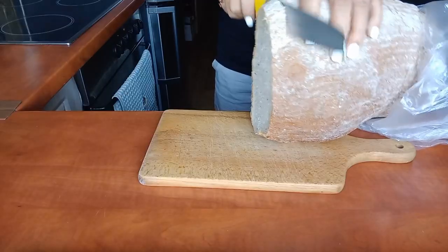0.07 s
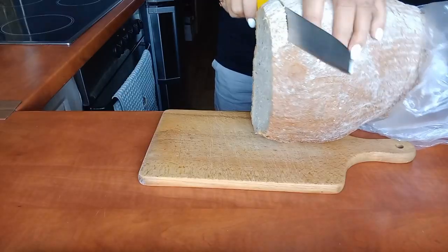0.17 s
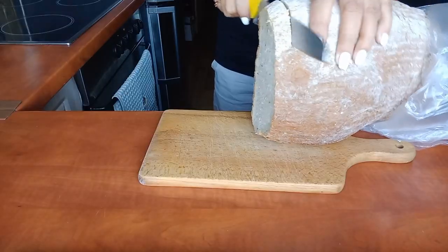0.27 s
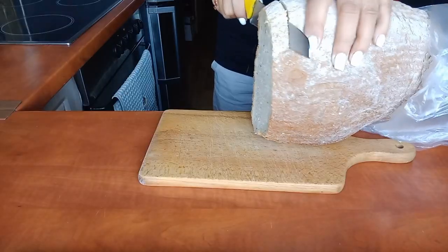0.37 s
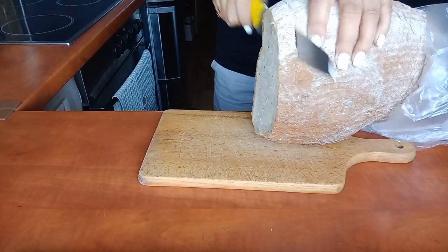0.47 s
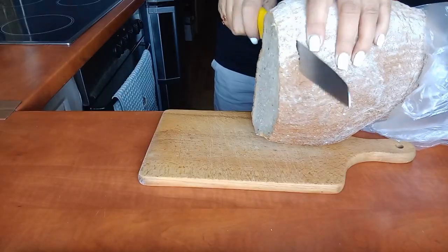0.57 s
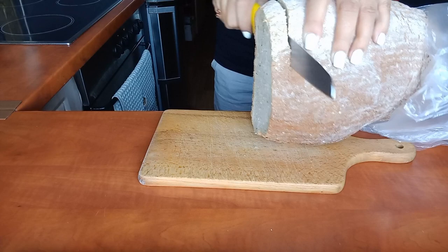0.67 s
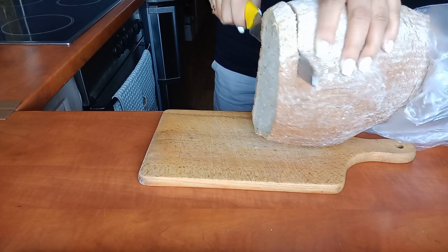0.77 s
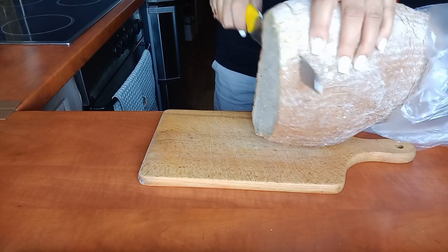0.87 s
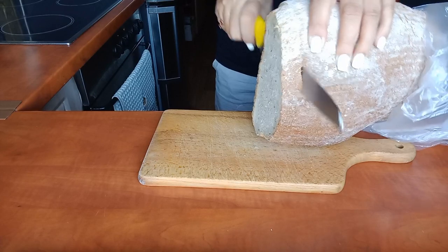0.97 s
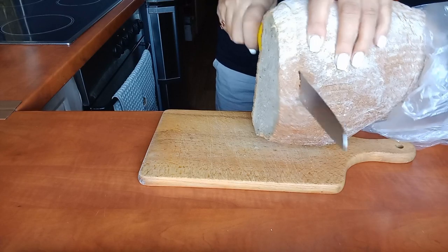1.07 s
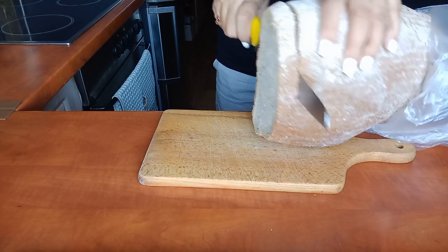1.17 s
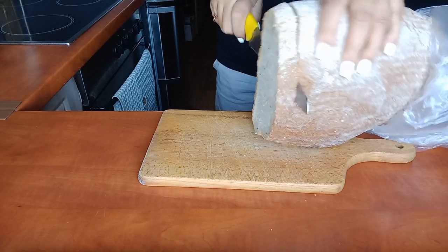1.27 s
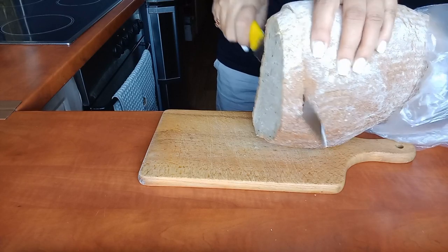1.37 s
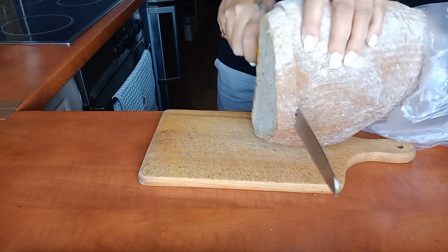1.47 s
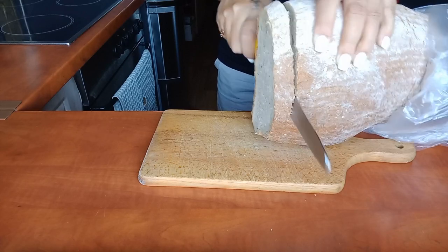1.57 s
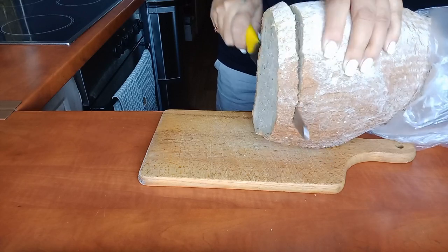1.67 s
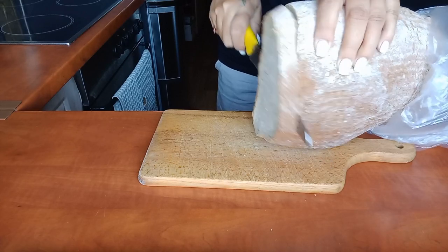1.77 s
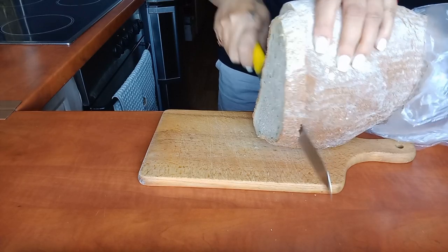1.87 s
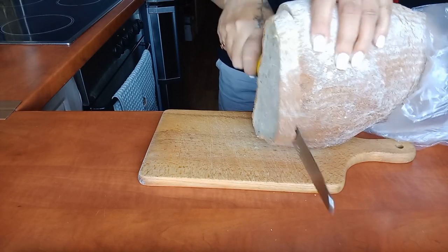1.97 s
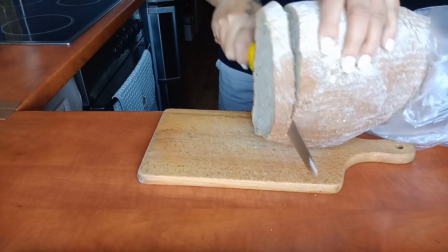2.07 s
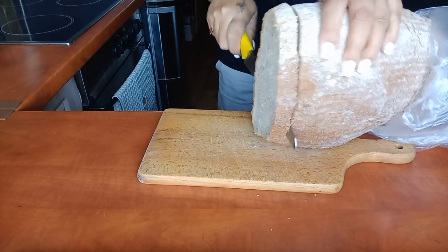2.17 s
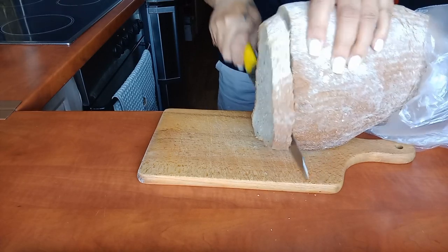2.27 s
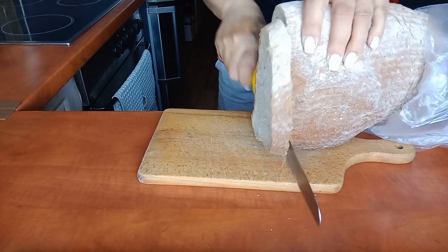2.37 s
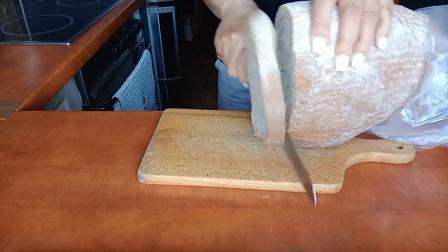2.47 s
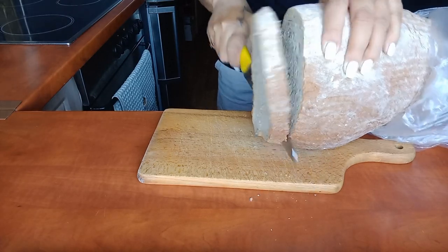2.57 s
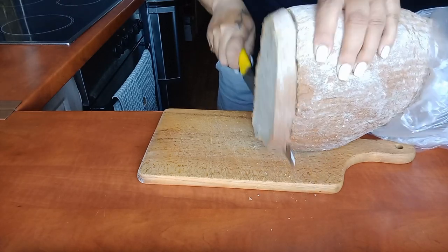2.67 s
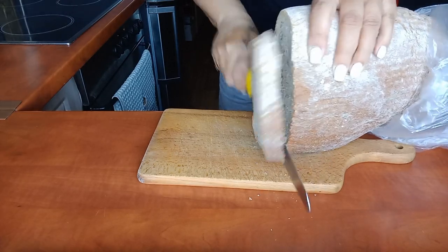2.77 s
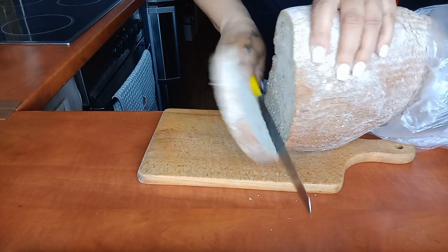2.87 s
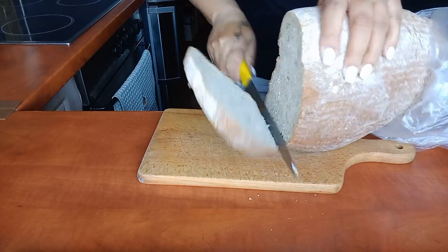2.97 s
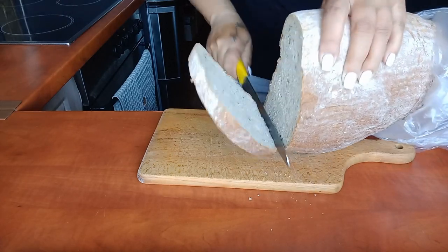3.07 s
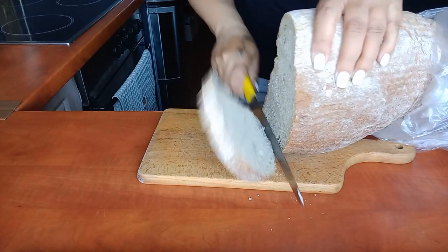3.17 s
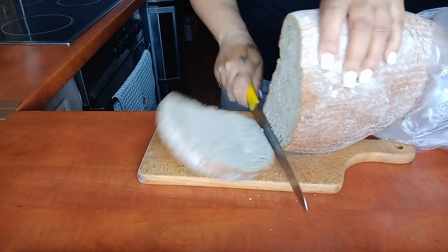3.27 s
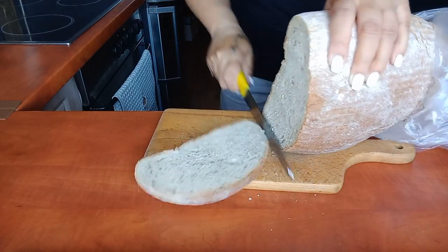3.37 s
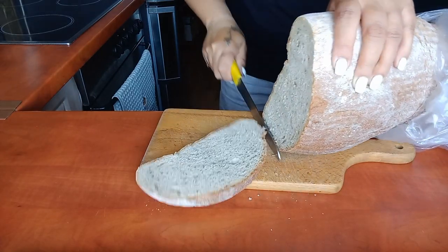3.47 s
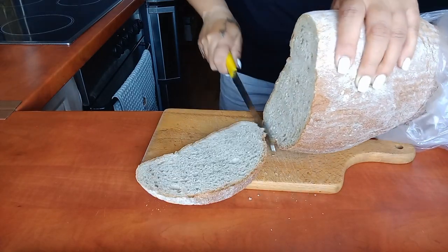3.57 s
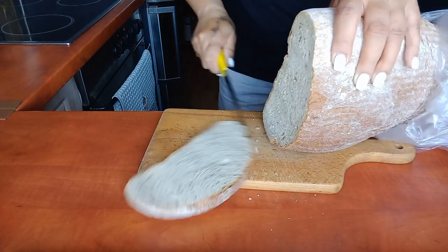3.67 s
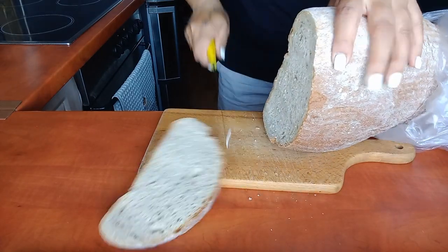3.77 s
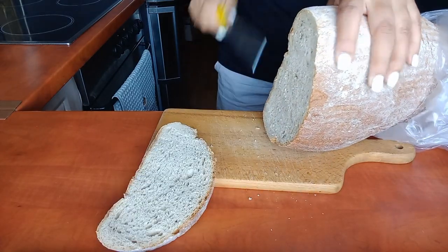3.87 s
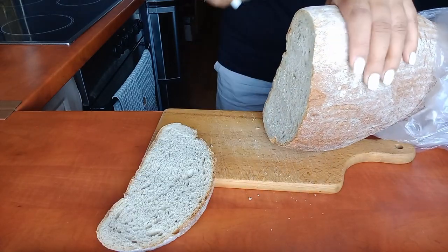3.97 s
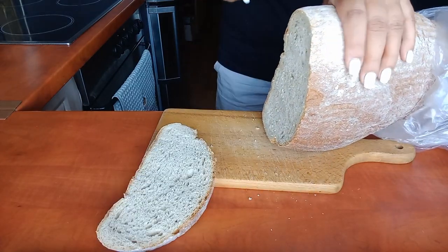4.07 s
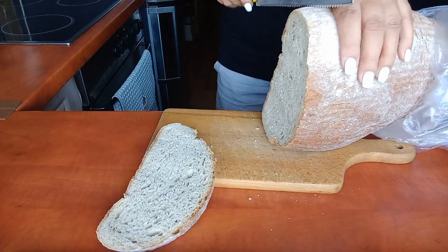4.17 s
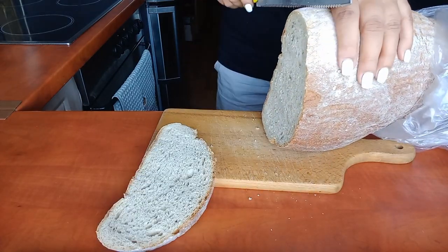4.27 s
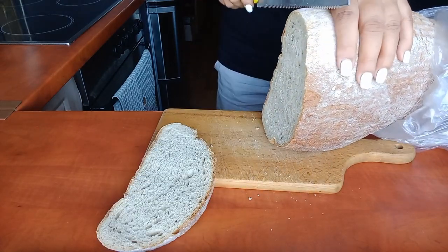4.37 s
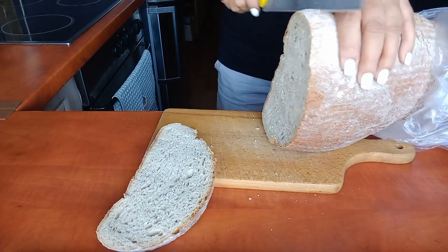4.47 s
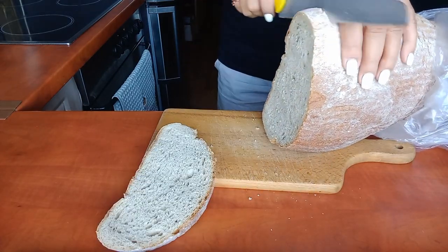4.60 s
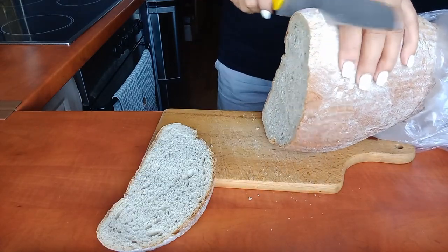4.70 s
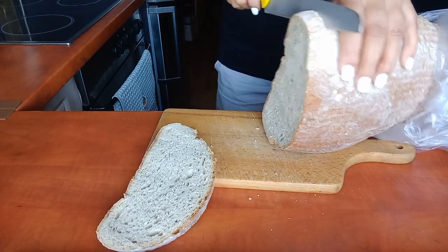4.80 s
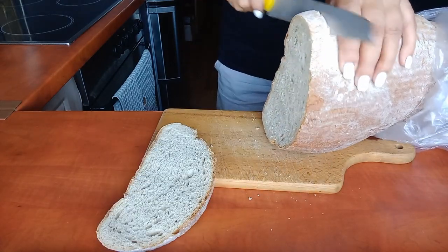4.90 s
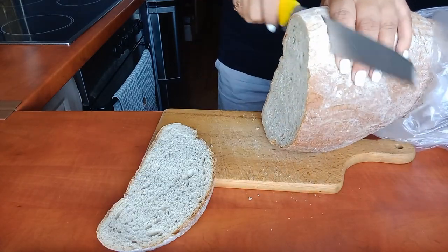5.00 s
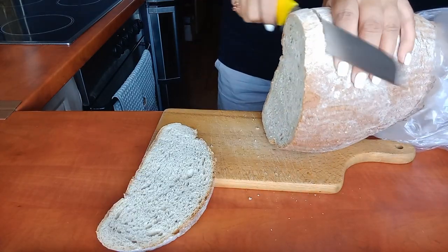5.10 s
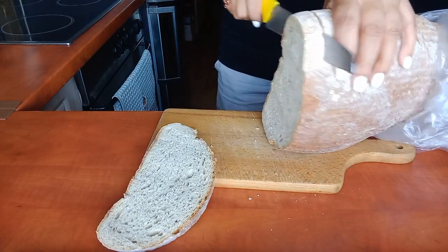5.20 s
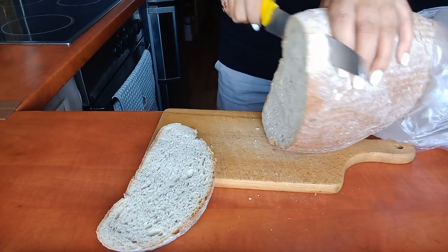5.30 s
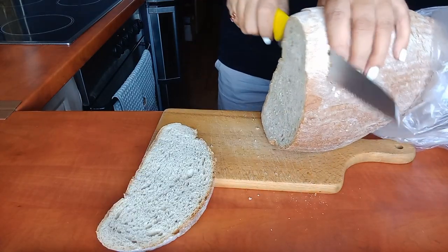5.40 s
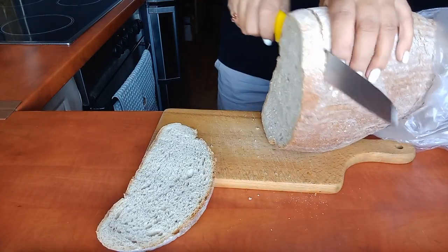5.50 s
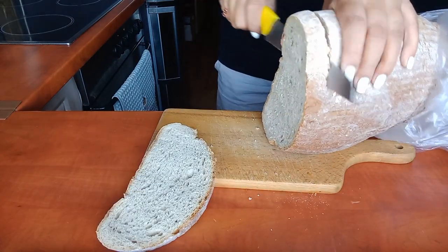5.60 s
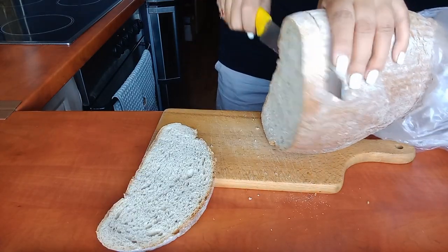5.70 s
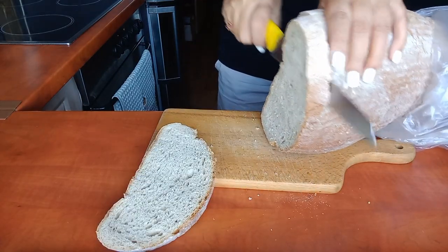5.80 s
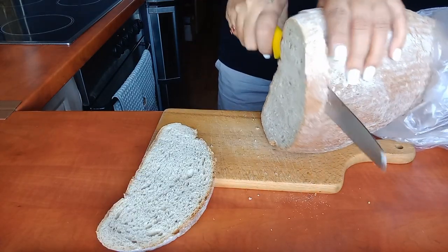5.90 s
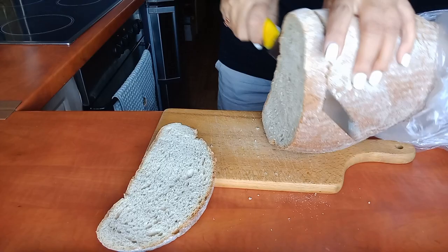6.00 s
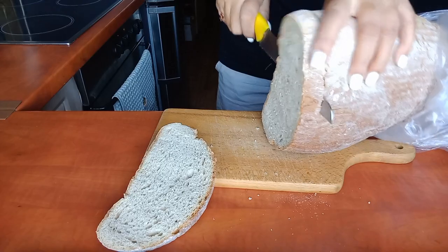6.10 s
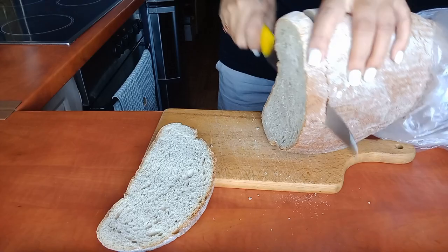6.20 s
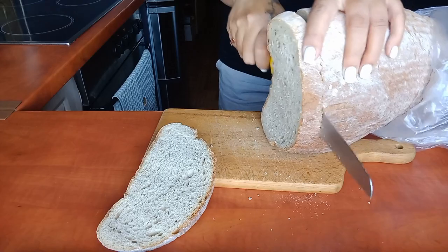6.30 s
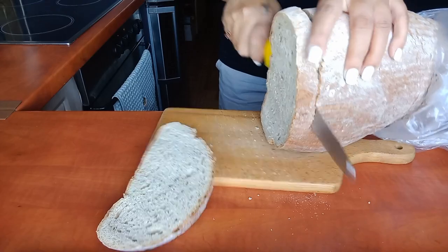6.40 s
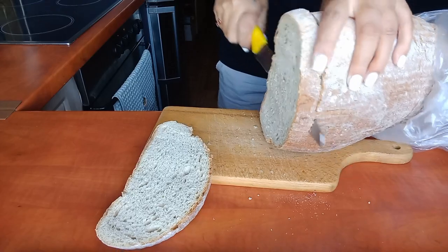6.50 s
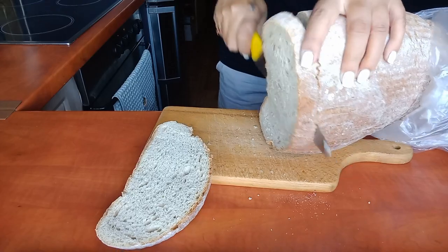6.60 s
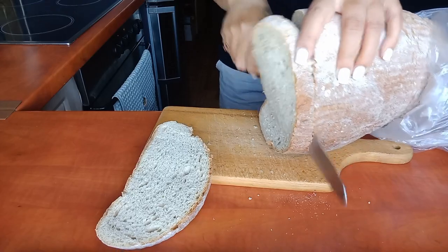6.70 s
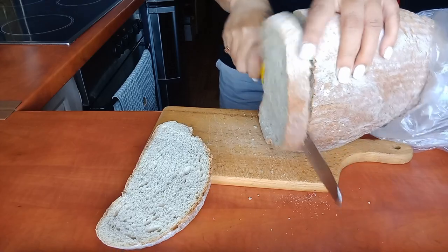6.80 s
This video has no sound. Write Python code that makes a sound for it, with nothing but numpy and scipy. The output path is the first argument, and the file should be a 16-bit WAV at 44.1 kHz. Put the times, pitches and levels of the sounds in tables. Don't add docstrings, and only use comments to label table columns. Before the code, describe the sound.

A serrated knife saws through a crusty loaf in steady rasping strokes, the slice slaps onto a wooden board, and sawing starts again.

```python
import sys
import numpy as np
from scipy import signal
from scipy.fft import rfft, irfft
from scipy.io import wavfile

SR = 44100
rng = np.random.default_rng(int(sys.argv[2]) if len(sys.argv) > 2 else 0)


def gain_from_db(level_db):
    decades = np.asarray(level_db, float) / 20
    return 10 ** decades


def materialize(psi):
    bounded = np.clip(np.atleast_2d(psi).T, -1, 1)
    quanta = np.round(bounded * 32767).astype(np.int16)
    wavfile.write(sys.argv[1], SR, quanta)


N = 302085

# start in seconds, length in seconds, crust hiss in dB, crumb tearing in dB, dryness in dB.
FIRST_SLICE_STROKES = [(0.014, 0.14, -40.5, -47, 7), (0.239, 0.13, -40, -41, 9),
                       (0.46, 0.13, -43, -50.5, 6.5), (0.708, 0.13, -41, -40, 4),
                       (0.903, 0.18, -43.5, -41.5, -4), (1.171, 0.14, -40, -35.5, -21),
                       (1.379, 0.15, -39, -33, -10), (1.613, 0.13, -39.5, -35.5, -1.5),
                       (1.82, 0.16, -41.5, -36.5, -3.5), (2.066, 0.17, -44, -40, 2),
                       (2.291, 0.14, -42, -38, 5), (2.522, 0.15, -43, -44, 7.5),
                       (2.725, 0.15, -42, -40.5, 7), (2.946, 0.17, -46, -50, 9.5),
                       (3.141, 0.19, -42, -35, 1), (3.343, 0.18, -41.5, -41.5, 6.5)]
SECOND_SLICE_STROKES = [(4.495, 0.17, -49.5, -48.5, -7), (4.701, 0.18, -48.5, -59, 12.5),
                        (4.931, 0.15, -38.5, -37, 0), (5.138, 0.12, -39, -40, 5.5),
                        (5.337, 0.14, -41, -39, -7), (5.569, 0.13, -43, -35.5, -6),
                        (5.785, 0.13, -39.5, -38.5, 1.5), (5.998, 0.13, -41, -34.5, -11),
                        (6.195, 0.16, -40, -33, -12), (6.434, 0.14, -41, -31.5, -13),
                        (6.656, 0.13, -39.5, -37, 7.5)]
# hardest push in seconds after the stroke's start,
# push length in seconds, deep shake in dB, upper shake in dB, tooth catches per second.
FIRST_SLICE_PUSHES = [(0.069, 0.13, -36.5, -36, 112), (.075, .14, -48, -39.5, 128),
                      (.062, 0.1, -32.5, -32, 104), (.055, 0.14, -35.5, -36.5, 94),
                      (.082, 0.15, -38, -38.5, 95), (.072, 0.12, -28, -34.5, 100),
                      (0.0579, .16, -34.5, -37.5, 99), (.048, 0.12, -30, -34, 128),
                      (.085, .14, -37, -36, 110), (0.0869, .12, -35, -36, 112),
                      (.06, 0.15, -41.5, -40, 128), (.06, 0.12, -43, -41.5, 120),
                      (.075, 0.12, -41.5, -42.5, 108), (.06, 0.093, -42.5, -41.5, 127),
                      (0.088, .15, -36, -33, 125), (0.07, .14, -37.5, -41, 131)]
SECOND_SLICE_PUSHES = [(0.053, 0.14, -40.5, -44.5, 91), (.09, .12, -41, -47.5, 125),
                       (.095, 0.12, -34, -39, 105), (0.076, 0.12, -65, -38, 122),
                       (.08, 0.13, -30.5, -36.5, 106), (.085, 0.18, -38.5, -38, 98),
                       (0.036, 0.1, -31.5, -36.5, 90), (.08, .14, -34, -38, 120),
                       (.085, .15, -36.5, -35.5, 93), (.07, .14, -34.5, -39.5, 127),
                       (0.059, 0.12, -35, -35.5, 125)]
BITES = [0.464, 0.704, 1.179, 2.073, 2.31, 2.533, 3.15, 3.404, 4.93, 5.575, 6.43]
# time in seconds, peak in dB.
CRUST_SNAPS = [(0.4647, -32), (0.5008, -36), (0.7078, -36), (1.01, -28), (1.399, -30), (1.474, -26.5),
               (1.674, -42), (1.8849, -18), (1.9571, -34), (2.316, -30.5), (2.996, -43), (3.057, -35),
               (3.3585, -30.5), (3.4094, -28), (3.4271, -33), (3.6943, -48), (4.2061, -55.5), (4.967, -38),
               (5.176, -27), (5.818, -28), (5.8343, -24), (6.2187, -26), (6.444, -32), (6.5096, -28),
               (6.6394, -39), (6.6765, -28), (6.743, -23), (6.7443, -34)]
# time in seconds, pressure on the board in dB.
SLICE_PRESSURE = [
    (3.404, -42),
    (3.426, -40.5),
    (3.455, -35),
    (3.51, -41.5),
    (3.65, -50.5),
    (3.71, -52.5),
    (3.8, -61),
    (3.83, -65),
    (3.93, -74.5),
]
# time in seconds, peak in dB.
SLICE_KNOCKS = [(3.405, -33), (3.4257, 4), (3.4346, -20), (3.4435, -30), (3.4553, -12), (3.4647, -13),
                (3.4712, -13), (3.4791, -15), (3.4848, -15), (3.494, -11), (3.5024, -22), (3.5172, -16.5),
                (3.5327, -15.5), (3.5435, -21), (3.6136, -34), (3.6202, -28.5), (3.6543, -26),
                (3.6604, -21), (3.6718, -33), (3.679, -20), (3.689, -29.5), (3.6964, -18), (3.7059, -20.5),
                (3.7162, -30), (3.7896, -40)]
# time in seconds, level in dB.
BAG_CREASES = [
    (3.955, -62.5),
    (4.038, -65.5),
    (4.082, -64),
    (4.166, -68.5),
    (4.26, -73),
]

# frequency in Hz, level in dB, 60 dB decay in seconds.
COUNTER_DEEP_MODES = [(94.8, -1.5, 0.057), (129.4, -5, 0.084)]
COUNTER_UPPER_MODES = [(198, -8.5, 0.071), (199.8, 8.5, 0.073), (212, -1, 0.047), (284.6, 0.5, 0.13)]
BOARD_MODES = [(250, -5.5, 0.084), (350, -8, 0.073), (493, -7, .08), (559, -6.5, 0.019),
               (670, -24.5, 0.062), (794, -1, 0.06), (908, 5, 0.036), (1007, -2.5, 0.048),
               (1084, -5.5, 0.023), (1280, 5, 0.016), (1530, -13.5, 0.017), (1560, 1, 0.017)]

# frequency in Hz, level in dB per Hz.
CRUMB_COLOUR = [(180, -32), (300, -6.5), (384, -3.5), (483, -2), (718, -6.5), (822, -9.5), (883, -7),
                (1120, -12), (1260, -11), (2000, -16.5), (2600, -58.5), (4400, -120)]
CRUST_COLOUR = [(710, -22.5), (1200, -12), (1290, -4), (1830, -4.5), (2020, -2.5), (2980, -5.5), (3790, -6),
                (6950, -11.5), (7910, -5.5), (9210, -18.5), (13200, -15), (15200, -15.5), (16000, -33)]
BAG_COLOUR = [(1180, -30), (2000, -11), (3140, -10), (4450, -6.5), (6590, -7.5), (7910, 1), (9330, -12.5),
              (11700, -11.5), (15100, -8), (16000, -10.5)]
AIR_COLOUR = [(24, -48.5), (40, -28.5), (66, -15.5), (124, -10), (171, -20.5), (226, -16), (422, -23.5),
              (831, -21), (1040, -26.5), (2210, -34.5), (7730, -30), (9450, -38.5), (16000, -46)]
# frequency in Hz, level in dB rms.
FRIDGE_HUM = [(86.1, -71.5), (172.3, -67.5), (199.2, -77)]


def rms_one(x):
    return x / np.sqrt(np.mean(x ** 2) + 1e-20)


def bandpass(x, order, low_hz, high_hz):
    return signal.sosfilt(signal.butter(order, [low_hz, high_hz], "band", fs=SR, output="sos"), x)


def in_time(rows, outside):
    s, *columns = np.transpose(rows)
    return np.array([np.interp(np.arange(N) / SR, s, c, outside, outside) for c in columns])


def drift(rate_hz):
    r = np.exp(-40 * np.pi * rate_hz / SR)
    noise = rng.standard_normal(N // 20 + 2002)
    slow = signal.lfilter([1], [1, -2 * r, r * r], noise)[2000:]
    return np.interp(np.arange(N) / 20, np.arange(len(slow)), rms_one(slow))


def colour(x, spectrum):
    hz, level_db = np.transpose(spectrum)
    grid_hz = np.maximum(np.arange(2049) * SR / 4096, 1)
    log_gain = np.interp(np.log(grid_hz), np.log(hz), level_db) * np.log(10) / 20
    cepstrum = irfft(log_gain)
    cepstrum[1:2048] *= 2
    cepstrum[2049:] = 0
    impulse = irfft(np.exp(rfft(cepstrum)))
    return rms_one(signal.fftconvolve(x, impulse)[:N])


def ring(clicks, modes):
    out = 0
    for hz, level_db, t60_s in modes:
        r, w = gain_from_db(-60 / (t60_s * SR)), 2 * np.pi * hz / SR
        poles = [1, -2 * r * np.cos(w), r * r]
        out = out + signal.lfilter([0, gain_from_db(level_db) * np.sin(w)], poles, clicks + 1e-18)
    return out


def swells(top_s, rise_s, fall_s, top_db, shape):
    rise_db, rise_power, fall_db, fall_power = shape
    after_s = np.arange(0, N + 40, 40) / SR - top_s[:, None]
    rise = rise_db * (np.maximum(-after_s, 0) / rise_s[:, None]) ** rise_power
    fall = fall_db * (np.maximum(after_s, 0) / fall_s[:, None]) ** fall_power
    power = np.sum(gain_from_db(top_db[:, None] - rise - fall) ** 2, axis=0) + 1e-12
    return np.interp(np.arange(N) / 40, np.arange(len(power)), 10 * np.log10(power))


def grains(per_s, spread_db, clump_db):
    sizes = gain_from_db(spread_db * np.minimum(rng.exponential(1, N), 4)) * rng.choice([-1, 1], N)
    happens = rng.random(N) < per_s / SR
    return rms_one(sizes * happens * gain_from_db(clump_db * drift(60)))


def ports(x, pan_db):
    lag = 8
    return np.array([x * gain_from_db(pan_db / 2), np.roll(x, lag) * gain_from_db(-pan_db / 2)])


def spread_out(per_s, spectrum, clump_db, patchy_db, alike):
    clumps = gain_from_db(clump_db * (drift(90) + 0.6 * drift(22)))
    shared, left, right = (grains(per_s, spread_db=1.0, clump_db=0.6) * clumps for k in range(3))
    pair = np.sqrt(alike) * ports(shared, pan_db=2.9) + np.sqrt(1 - alike) * np.array([left, right])
    pair = np.array([colour(side, spectrum) for side in pair])
    out, edges_hz = 0, np.geomspace(200, 18000, num=12)
    for low_hz, high_hz in zip(edges_hz, edges_hz[1:]):
        out = out + bandpass(pair, 1, low_hz, high_hz) * gain_from_db(patchy_db * drift(15))
    return rms_one(out) * gain_from_db([[1], [-1]])


def background():
    shared, t = rng.standard_normal(N), np.arange(N) / SR
    air = np.array([colour(shared + 1.7 * rng.standard_normal(N), AIR_COLOUR) for side in "LR"])
    hum = 0
    for hz, db in FRIDGE_HUM:
        hum = hum + np.sqrt(2) * gain_from_db(db + 2.0 * drift(15)) * np.sin(2 * np.pi * hz * t)
    return gain_from_db(-67) * air + hum


def strokes():
    start, length, crust_db, crumb_db, dryness_db = np.transpose(FIRST_SLICE_STROKES + SECOND_SLICE_STROKES)
    push, push_s, deep_db, upper_db, per_s = np.transpose(FIRST_SLICE_PUSHES + SECOND_SLICE_PUSHES)
    t = np.arange(N) / SR
    bitten = np.abs(start[:, None] - BITES).min(axis=1) < 0.02
    fastest = np.where(bitten, 0.38, 0.5)
    blade = start + fastest * length, fastest * length, (1 - fastest) * length
    build_up = 0.49
    hand = start + push, build_up * push_s, (1 - build_up) * push_s
    stall_s, stall_depth_db = 0.03, 6.0
    stall_db = stall_depth_db * sum(np.clip(1 + (t - s) / stall_s, 0, 1) * (t < s) for s in BITES)
    crust_swell, crumb_swell = (9.16, 1.8, 11, 1.34), (12.4, 2.2, 13.4, 1.3)
    shake_swell = (13.5, 1.8, 10.3, 1.3)
    return (swells(*blade, crust_db, crust_swell) - stall_db,
            swells(*blade, crumb_db, crumb_swell) - stall_db,
            np.interp(t, blade[0], 1.17 * dryness_db),
            swells(*hand, deep_db, shake_swell),
            swells(*hand, upper_db, shake_swell),
            np.interp(t, hand[0], per_s))


def teeth(per_s):
    turns = np.cumsum(np.clip(per_s, 40, 300) * (1 + 0.08 * drift(29.37))) / SR
    clicks = np.diff(np.floor(turns), prepend=0)
    return rms_one(clicks * gain_from_db(3.8 * drift(38)))


def counter(shake_db, catches, modes, rubbing):
    scale = np.std(ring(rng.standard_normal(N), modes))
    push = catches + rubbing * rng.standard_normal(N)
    return ring(gain_from_db(shake_db - 2.0) * push, modes) / scale


def crust(crust_db):
    snaps, t = np.zeros(N), np.arange(300) / SR
    snaps[[round(s * SR) for s, db in CRUST_SNAPS]] = gain_from_db(np.array(CRUST_SNAPS)[:, 1] + 3.5)
    flakes_within_s, flake_db = 0.014, -8.0
    for (s, db), shifts in zip(CRUST_SNAPS, rng.uniform(-1, 1, (len(CRUST_SNAPS), 3))):
        snaps[((s + flakes_within_s * shifts) * SR).astype(int)] += gain_from_db(db + flake_db)
    bursts = np.convolve(snaps, np.exp(-t / 0.0009))[:N] * rng.standard_normal(N)
    bursts = bandpass(bursts, 4, 1800, 8600)
    hiss = spread_out(4500, CRUST_COLOUR, clump_db=0.88, patchy_db=1.5, alike=0.14)
    return gain_from_db(crust_db + 0.5) * hiss + gain_from_db(-3.0) * ports(bursts, pan_db=2.8)


def crumb(tearing_db, dryness_db):
    rasp = spread_out(1800, CRUMB_COLOUR, clump_db=1.0, patchy_db=1.8, alike=0.75)
    dull = signal.lfilter(*signal.butter(1, 950, fs=SR), rasp)
    bright = gain_from_db(np.clip(dryness_db, -12, 12)) * (rasp - dull)
    return gain_from_db(tearing_db - 2.5) * (dull + bright)


def board(rattle_db):
    knocks = np.zeros(N)
    knocks[[round(s * SR) for s, db in SLICE_KNOCKS]] = -gain_from_db(np.array(SLICE_KNOCKS)[:, 1] - 15.0)
    chatter = gain_from_db(np.minimum(rattle_db, -24) - 36) * grains(900, spread_db=3.5, clump_db=2.5)
    dragged = np.arange(N) > 3.6 * SR
    slap = bandpass((knocks + chatter) * ~dragged, 3, 350, 1500)
    drag = bandpass((knocks + chatter) * dragged, 3, 550, 1200)
    tick = bandpass(knocks * (1 + 3 * dragged), 2, 2300, 2800)
    return ring(slap + gain_from_db(4.5) * drag, BOARD_MODES) + gain_from_db(19.0) * tick


def bag():
    s, db = np.transpose(BAG_CREASES)
    one_s = np.ones(len(s))
    crease_db = swells(s, one_s, one_s, db, (300.5, 1, 92.5, 1))
    rustle = spread_out(6000, BAG_COLOUR, clump_db=0.5, patchy_db=1.5, alike=0.25)
    return gain_from_db(crease_db + 3.0) * rustle


def kitchen(x):
    low_t60_s, treble_t60_s, wall_cut_hz = 0.25, 0.38, 4700
    t = np.arange(SR // 2) / SR
    noise = rng.standard_normal((2, len(t)))
    low = signal.lfilter(*signal.butter(1, wall_cut_hz, fs=SR), noise)
    tail = low * gain_from_db(-60 * t / low_t60_s) + (noise - low) * gain_from_db(-60 * t / treble_t60_s)
    tail *= np.clip(t / 0.0011 - 0.3, 0, 1) / np.sqrt(0.012 * SR)
    return signal.fftconvolve(x[None], tail)[:, :N]


def scene():
    crust_db, crumb_db, dryness_db, deep_db, upper_db, per_s = strokes()
    slide_db, = in_time(SLICE_PRESSURE, -120)
    slide_shake_db = slide_db + 4.5
    catches = teeth(per_s)
    deep = counter(np.maximum(deep_db, slide_shake_db - 0.5), catches, COUNTER_DEEP_MODES, rubbing=0.68)
    upper = counter(np.maximum(upper_db, slide_shake_db - 1.5), catches, COUNTER_UPPER_MODES, rubbing=0.81)
    shake = deep + upper
    hiss = crust(np.maximum(crust_db, slide_db))
    rasp = crumb(crumb_db, dryness_db)
    knock = board(-32.5 + 1.6 * (slide_db + 50))
    rustle = bag()
    wet = gain_from_db(-11.0) * shake + gain_from_db(-6.5) * rasp[0] + gain_from_db(-10.5) * (hiss[0] + rustle[0]) + gain_from_db(-7) * knock
    direct = ports(shake, pan_db=0.6) + ports(knock, pan_db=1.7) + rasp + hiss + rustle
    return direct + kitchen(wet) + background()


def low_pass(x):
    return signal.sosfilt(signal.butter(12, 16180, fs=SR, output="sos"), x)


def record(dry):
    rounded = 1.366 * np.tanh(dry / 1.225)
    no_bass = signal.sosfilt(signal.butter(5, 72, "high", fs=SR, output="sos"), rounded)
    mix = signal.sosfilt(signal.ellip(10, 0.5, 70, 15800, fs=SR, output="sos"), no_bass)
    return low_pass(mix)


dry = scene()
out = record(dry)
materialize(out)
```